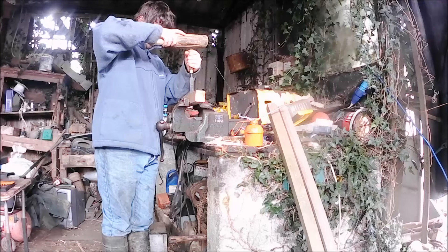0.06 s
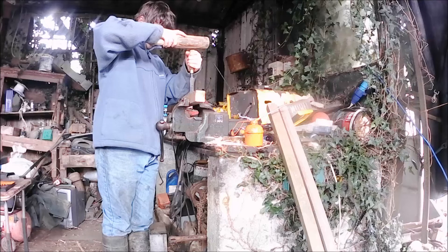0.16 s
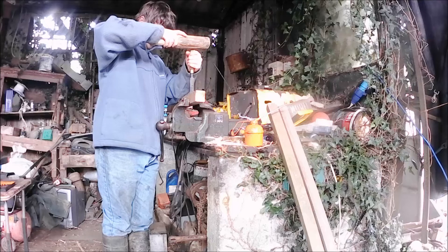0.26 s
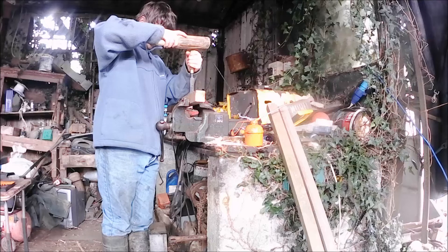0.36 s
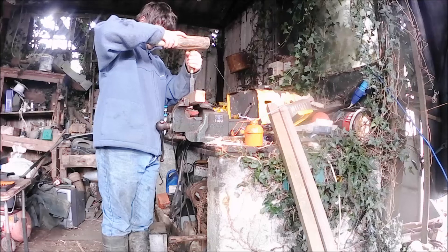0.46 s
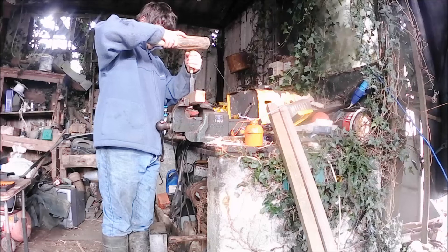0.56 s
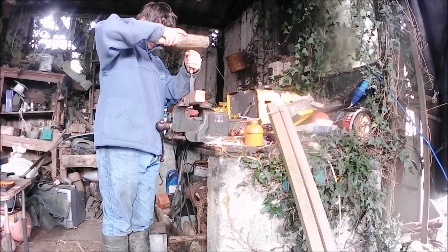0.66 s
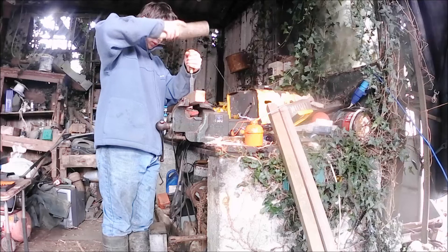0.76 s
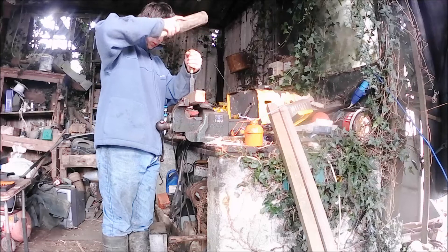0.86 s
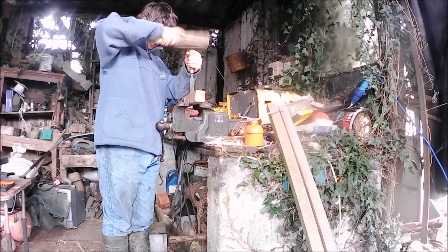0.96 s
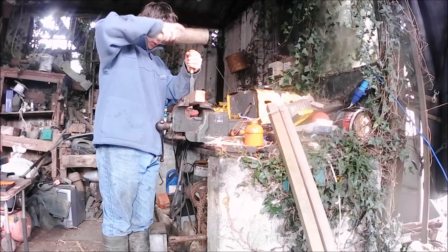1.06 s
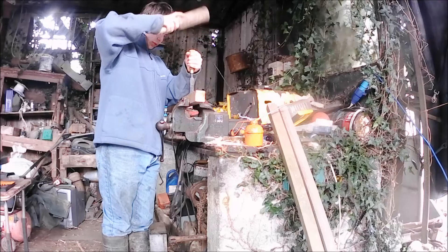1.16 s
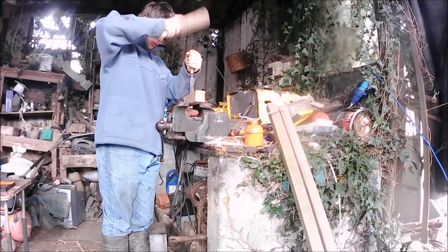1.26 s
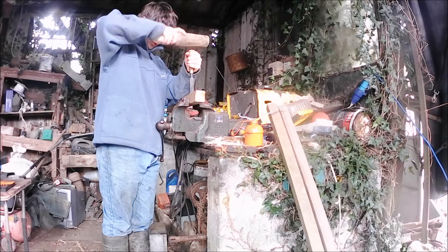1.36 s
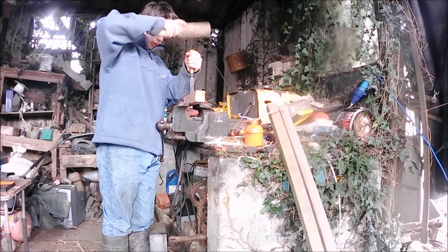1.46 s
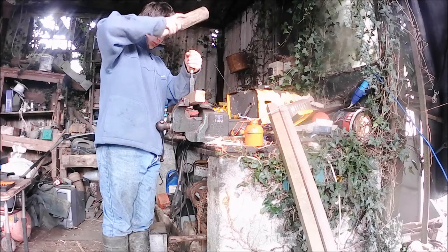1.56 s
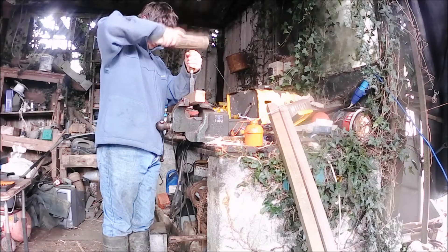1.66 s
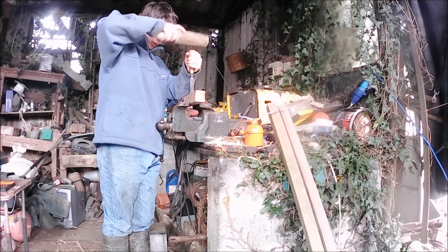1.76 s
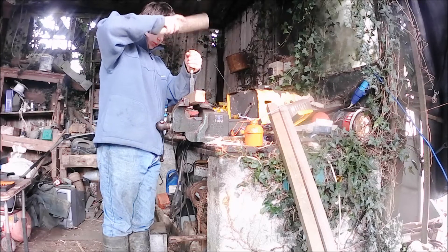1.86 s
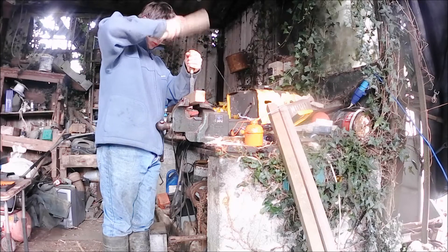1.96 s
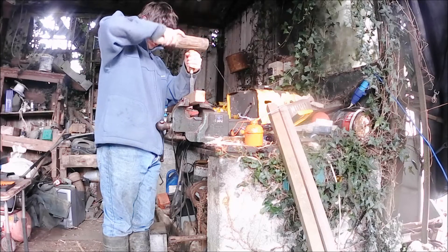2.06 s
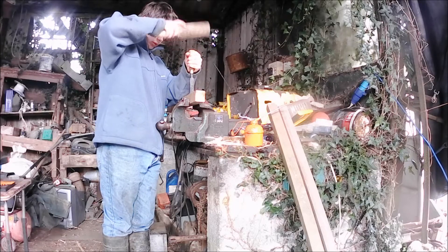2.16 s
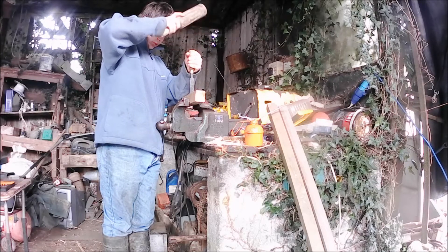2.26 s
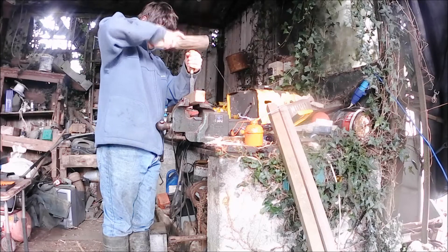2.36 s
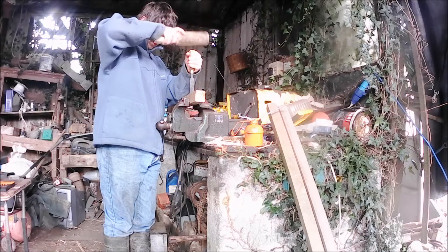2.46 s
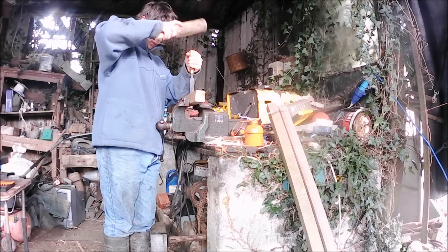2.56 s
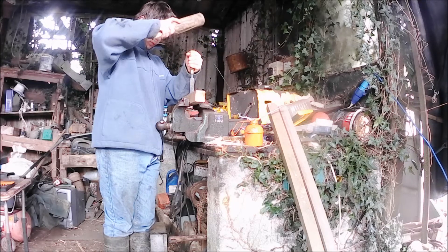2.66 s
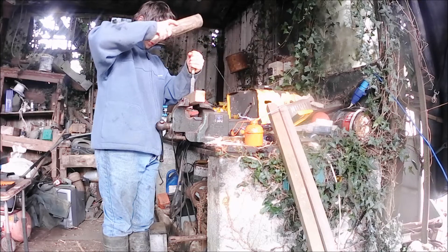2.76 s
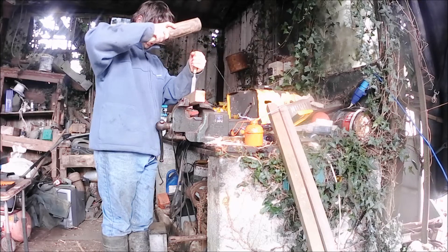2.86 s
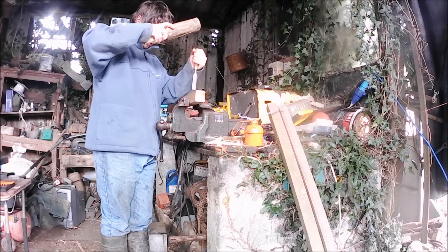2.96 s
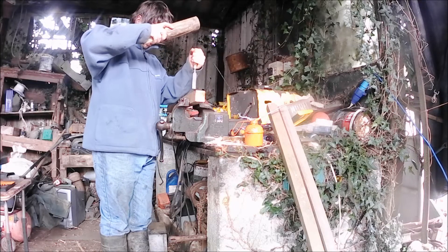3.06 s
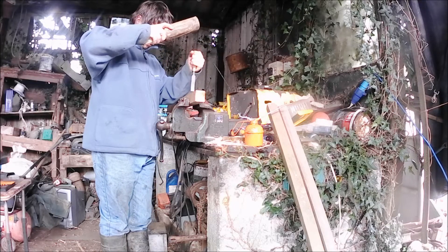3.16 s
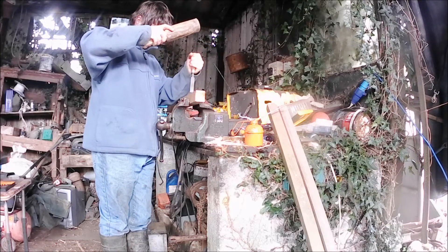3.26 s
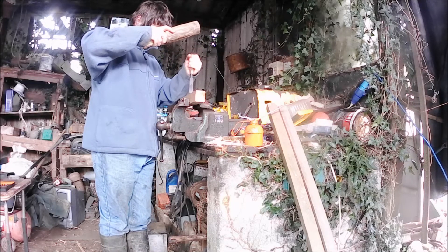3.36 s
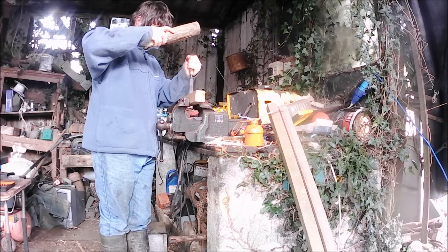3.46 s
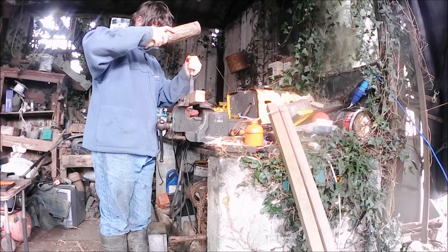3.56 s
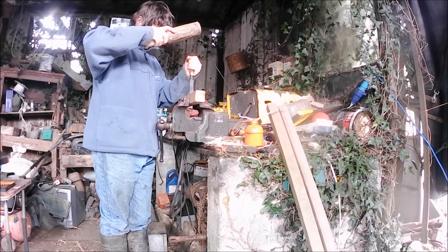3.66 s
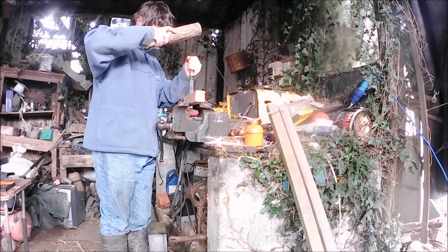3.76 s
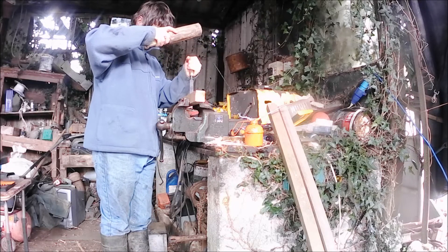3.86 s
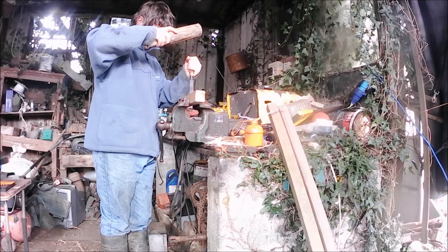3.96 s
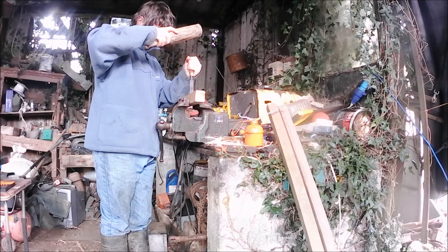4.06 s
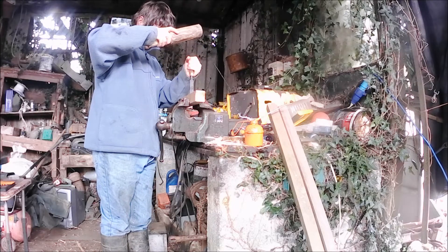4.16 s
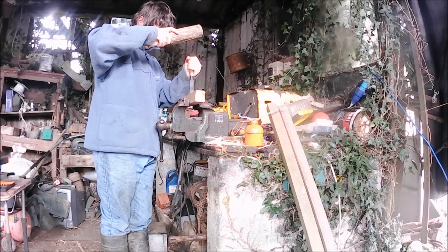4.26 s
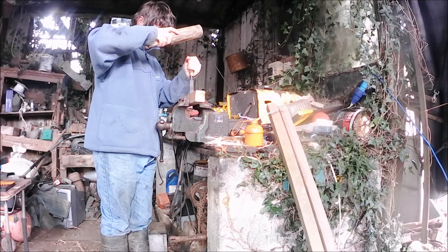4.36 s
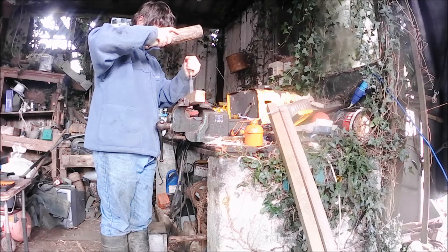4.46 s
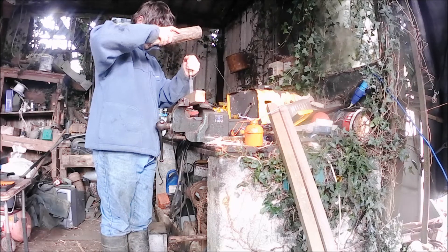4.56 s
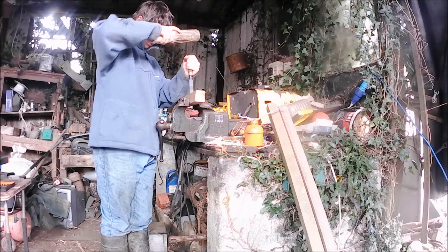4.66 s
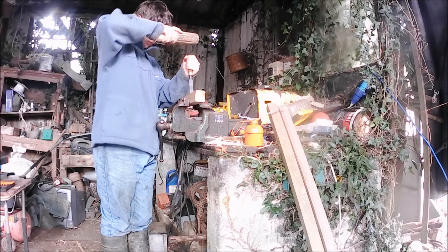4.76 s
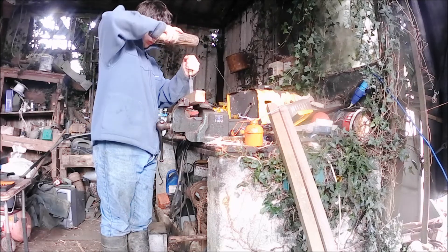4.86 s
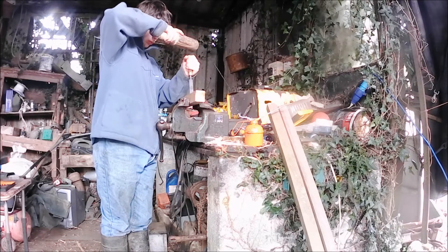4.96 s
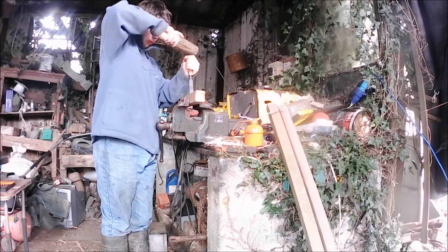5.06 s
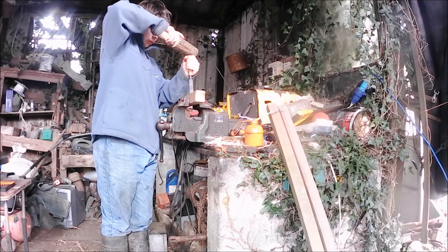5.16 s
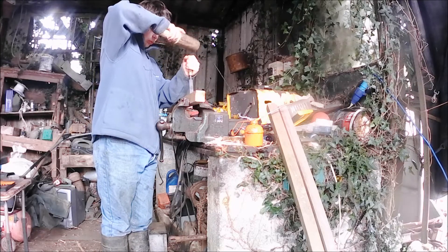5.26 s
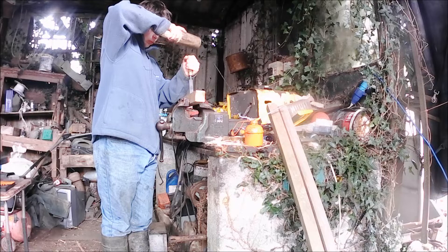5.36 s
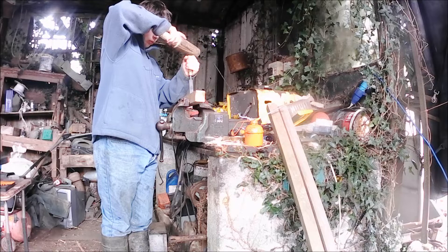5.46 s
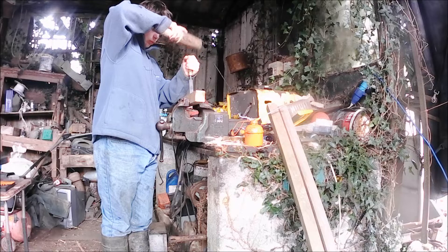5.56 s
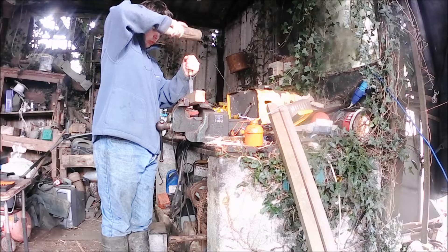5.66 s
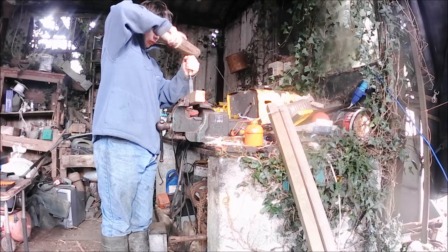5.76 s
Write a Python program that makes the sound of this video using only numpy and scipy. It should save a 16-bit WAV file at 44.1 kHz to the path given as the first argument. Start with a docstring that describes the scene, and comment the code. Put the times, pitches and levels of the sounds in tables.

```python
"""An open shed, heard from a few metres: a wooden mallet knocks a chisel into a block held in a vise.
Each blow is a bright crack of mallet on handle (damped sines and a noise snap), then the deeper knock
of bench and vise; vise jaws and planks ring on, and echoes and a diffuse tail give the shed.
Outside, a sparrow chirrups, distant birds cheep low and others whistle high, all near sines on moving pitches.
Beneath lie the hush of the yard and microphone hiss, shaped from noise, and a thin whine of electronics."""
import sys
import numpy as np
from scipy import signal
from scipy.fft import rfft, irfft
from scipy.io import wavfile
from scipy.ndimage import uniform_filter1d

SR = 44100
rng = np.random.default_rng(int(sys.argv[2]) if len(sys.argv) > 2 else 0)


def master_out(mix):
    """Clip the mix to full scale and print it as 16-bit PCM to the path in sys.argv[1]."""
    frames = np.transpose(np.atleast_2d(mix))
    ceiling = np.clip(frames, -1, 1)
    pcm = np.round(ceiling * 32767).astype(np.int16)
    wavfile.write(sys.argv[1], SR, pcm)


N = 255780  # samples


def amp(db):
    """Amplitude factor for a level in dB."""
    return 10 ** (np.asarray(db) / 20)


def evened(x):
    """Scale to an RMS of 1."""
    return x / np.sqrt(np.mean(x ** 2) + 1e-20)


def read(points, hz):
    """Read a curve over frequency, straight between its points on a log axis."""
    f, value = np.transpose(points)
    return np.interp(np.log(hz + 1), np.log(f + 1), value)


def add(mix, s, sound):
    """Lay a sound into the mix at s seconds, cut at the end of the mix."""
    part = mix[round(s * SR):][:len(sound)]
    part += sound[:len(part)]


def ring(modes, spread_db, rise_cycles):
    """Damped sines; mode levels vary at every call, and low modes take longer to build up."""
    hz, db, t60 = np.transpose(modes)[:, :, None]
    t = np.arange(SR // 2) / SR
    db = db + spread_db * rng.standard_normal(db.shape)
    rise = 1 - np.exp(-t * hz / rise_cycles)
    partials = amp(db - 60 * t / t60) * rise * np.sin(2 * np.pi * hz * t)
    return partials.sum(0)


def tail(decays, start_s):
    """Sparse taps of random sign, one in every 20 samples, each band dying at its own speed; energy 1."""
    slots = np.arange(0, SR // 2, 20)
    taps = np.zeros(SR // 2 + 20)
    places = slots + rng.integers(0, 20, len(slots))
    taps[places] = rng.choice([-1., 1.], len(slots))
    hz, t, z = signal.stft(taps, SR, nperseg=256)
    decay = amp(-60 * t / read(decays, hz)[:, None])
    out = signal.istft(z * decay, SR, nperseg=256)[1]
    out *= np.clip(np.arange(len(out)) / (start_s * SR) - 1, 0, 1)  # builds up after the first walls
    return out / np.linalg.norm(out)


def tone(hz, taper, flutter_db, warble, partials=((1, 0),)):
    """Near sines on a pitch curve, faded in and out, with a hoarse warble in pitch and a flutter in level."""
    slow_noise = uniform_filter1d(rng.standard_normal((2, SR // 4)), size=90)
    flutter, wander = evened(slow_noise)[:, :len(hz)]
    phase = 2 * np.pi * np.cumsum(hz * (1 + warble * wander)) / SR
    fade = signal.windows.tukey(len(hz), np.clip(taper, 0, 1))
    waves = sum(amp(db) * np.sin(k * phase) for k, db in partials)
    return np.sqrt(2) * fade * amp(flutter_db * flutter) * waves


# mallet blows: [t/s, strength/dB, crack brightness/dB, vise jaw ring/dB]
MALLET_BLOWS = [(1.044, -18, -2.5, 2.5), (1.3936, -10, -1.5, -1), (1.737, -8, -6, 3),
                (2.0860, -6, -5, -0.5), (2.43, -3.5, -4.5, -2.5), (5.5009, -20, -14, -2)]


def mallet():
    """The handle cracks, bench and vise answer, jaws and planks ring on; the shed replies."""
    lag_s = .0005  # short offset from table time to start of knock
    shock_s = .0038  # the vise answers after the chisel edge has bitten
    plank_delay_s = .0229  # the planks ring once the thud has settled
    knocks, rings, diffuse = np.zeros((3, N))
    for s, db, crack_db, jaws_db in MALLET_BLOWS:
        s += lag_s
        plank_db = .75 * db  # planks grow more slowly than the blow
        knock = np.zeros(SR)
        add(knock, 0, amp(db + crack_db - 7.5) * handle())
        add(knock, 0, amp(db + crack_db - 6.0) * snap())
        add(knock, .0025, amp(-8) * bench(db))
        add(knock, shock_s, amp(db - 5.5) * vise())
        add(rings, s + shock_s, amp(db + jaws_db - 11.5) * jaws())
        add(rings, s, amp(plank_db - 24.5) * thud())
        add(rings, s + plank_delay_s, amp(plank_db - 40.5) * planks())
        walls = 0.33 * knock
        add(walls, 0, amp(db + crack_db + 9.0) * spread())
        add(knocks, s, knock)
        add(diffuse, s, shed_tail(walls))
    heard = signal.fftconvolve(knocks, echoes())[:N] + diffuse + rings
    # the microphone passes little of the blows below 94.4 Hz
    return signal.sosfilt(signal.butter(3, 94.4, "high", fs=SR, output="sos"), heard)


# modes of mallet head and chisel handle: [f/Hz, relative level/dB, t60/s]
HANDLE_MODES = [(2010, -5.5, 0.011), (2249, -16, 0.12), (2945, -1, 0.023), (3620, -10.5, 0.0063),
                (4960, -6.5, 0.0055)]


def handle():
    """Bright crack: short modes of mallet head and chisel handle."""
    return ring(HANDLE_MODES, spread_db=1.5, rise_cycles=.9)


# colour of the splintering fibres: [f/Hz, relative level/dB per Hz]
SNAP_COLOUR = [(60, -63.5), (200, -15.5), (500, -8), (1200, -11.5), (2000, -0.5), (3300, -3.5),
               (4200, -9.5), (6000, -14), (7500, -29.5), (12000, -37)]


def snap():
    """Splintery snap as the edge parts the fibres: coloured noise that dies within milliseconds."""
    hz, t = np.fft.rfftfreq(4096, 1 / SR), np.arange(4096) / SR
    noise = evened(irfft(rfft(rng.standard_normal(4096)) * amp(read(SNAP_COLOUR, hz))))
    return noise * amp(-60 * t / 0.018) * (1 - np.exp(-t / 0.00028))  # t60 and rise time in s


# modes of bench top and block: [f/Hz, relative level/dB, t60/s]
BENCH_MODES = [(220.7, -19.5, 0.04), (317, -14, 0.027), (406, -22.5, 0.1), (511, -20, 0.11),
               (644, -36, 0.097), (765, -23, 0.052), (814, -26.5, 0.17), (910, -23.5, 0.12),
               (973, -28, 0.17), (1042, -24.5, 0.085), (1108, -22, 0.11), (1178, -22, .08)]
# how the bench grows with the blow: [f/Hz, dB of answer per dB of strength]
BENCH_RESPONSE = [(520, 0.92), (760, .4)]


def bench(strength_db):
    """Deeper knock of bench top and block, whose modes grow more slowly than the blow."""
    over_db = strength_db + 7  # at -7 dB the bench keeps the balance of its table
    modes = [(hz, db + read(BENCH_RESPONSE, hz) * over_db, t60) for hz, db, t60 in BENCH_MODES]
    return ring(modes, spread_db=2.0, rise_cycles=.9)


# modes of the iron vise: [f/Hz, relative level/dB, t60/s]
VISE_MODES = [(1108, -6.5, 0.0069), (1294, 5, 0.014), (1485, -21.5, 0.071), (1774, -6, 0.0084),
              (2990, -7, 0.0056)]


def vise():
    """Knock of the iron vise, heavily damped by the clamped block."""
    return ring(VISE_MODES, spread_db=0.5, rise_cycles=0.68)


# modes of the vise jaws: [f/Hz, relative level/dB, t60/s]
JAW_MODES = [(1342.5, 1, .11), (1352, -9, .22), (1316, -17, .1)]


def jaws():
    """Close modes of the vise jaws that ring on and beat."""
    return ring(JAW_MODES, spread_db=3.5, rise_cycles=10.0)


# bending wave in the planks: [start f/Hz, end f/Hz, glide time constant/s, t60/s]
PLANK_BEND = (480, 113.9, .013, 0.118)


def thud():
    """A low push whose pitch falls as the slower bending waves arrive."""
    start_hz, end_hz, glide_s, t60 = PLANK_BEND
    t = np.arange(SR // 4) / SR
    hz = end_hz + (start_hz - end_hz) * np.exp(-t / glide_s)
    envelope = amp(-60 * t / t60) * (1 - np.exp(-t / 0.00286))
    return envelope * np.sin(2 * np.pi * np.cumsum(hz) / SR)


# modes of the planks: [f/Hz, relative level/dB, t60/s]
PLANK_MODES = [(131.6, 0, 0.56), (124.6, -5, 0.55)]


def planks():
    """A close pair of low plank modes that rings on and beats."""
    return ring(PLANK_MODES, spread_db=3.5, rise_cycles=0.906)


# colour of the whole blow as the walls receive it: [f/Hz, relative level/dB per Hz]
WALL_COLOUR = [(80, -30), (250, -6), (700, -0.5), (1150, 1), (1600, -4), (2100, 2.5), (3300, -10.5),
               (4200, -13.5), (6000, -19), (7500, -28.5), (12000, -40)]


def spread():
    """The blow sent out to all sides, its modes blurred: one click with a smooth causal colour, energy 1."""
    hz = abs(np.fft.fftfreq(4096, 1 / SR))
    log_gain = np.log(amp(read(WALL_COLOUR, hz)))
    # minimum phase puts the energy at the front of the click
    spectrum = np.exp(log_gain - 1j * signal.hilbert(log_gain).imag)
    click = np.fft.ifft(spectrum).real[:2048]
    return click / np.linalg.norm(click)


# decay of the shed: [f/Hz, t60/s]
SHED_DECAY = [(100, 0.62), (400, 0.28), (1300, 0.3), (3000, 0.27), (6000, 0.26), (10000, 0.14)]


def shed_tail(walls):
    """Diffuse tail of the shed, its taps drawn at random for each blow."""
    return amp(-3) * signal.fftconvolve(walls, tail(SHED_DECAY, start_s=0.0033))


# first reflections in the shed: [delay t/s, level/dB against the direct sound]
REFLECTIONS = [(.0065, -16.5), (.009, -17), (0.0162, -13.5), (.023, -16.5), (0.029, -21)]


def echoes():
    """Direct sound plus single reflections of random sign."""
    taps = signal.unit_impulse(SR // 20)
    for s, db in REFLECTIONS:
        taps[round(s * SR)] += amp(db) * rng.choice([-1, 1])
    return taps


# decay of the yard: [f/Hz, t60/s]
YARD_DECAY = [(1500, .3), (5000, .18)]


def birds():
    """Sparrow, sinking cheeps and gliding whistles, smeared by the yard."""
    dry = sparrow() + cheeps() + whistles()
    yard = tail(YARD_DECAY, start_s=0.0031)
    return dry + amp(-2.5) * signal.fftconvolve(dry, yard)[:N]


# chirrups: [t/s, level/dB, pitch factor, lift of the two closing notes/dB]
CHIRRUPS = [(1.322, -55.5, 0.98, 8), (2.027, -56.5, 0.97, 3), (2.943, -65.5, 0.98, 6.5),
            (3.195, -53.5, 0.99, 2), (4.026, -58.5, 0.99, 3.5), (4.561, -72.5, 0.85, -7),
            (5.032, -56, 0.97, 6), (5.805, -58.5, 1.04, 5)]
# notes of a chirrup, before its pitch factor:
# [t/s from the main note, length/s, start f/Hz, end f/Hz, relative level/dB, trill height f/Hz]
CHIRRUP_NOTES = [(-.030, 0.03, 4166, 4600, -7.5, 0.5), (-.001, 0.043, 4220, 3800, -0.5, 1102.5),
                 (.033, .028, 3250, 4150, -12, 1.5), (.062, .036, 3500, 3050, -13, 606)]


def sparrow():
    """Chirrups on one pattern: a rising note, a trilled main note, a low close that climbs, then trills away."""
    dry = np.zeros(N)
    trill_s = .015  # the pitch flicks up once in every such period
    for s, db, factor, lift_db in CHIRRUPS:
        lifts = (0, 0, lift_db, lift_db)
        for (at, length, start_hz, end_hz, note_db, trill_hz), extra_db in zip(CHIRRUP_NOTES, lifts):
            t = np.arange(0, length, 1 / SR)
            flick = np.cos(np.pi * t / trill_s) ** 2 * (t > trill_s / 2)
            hz = start_hz + (end_hz - start_hz) * t / length
            hz += trill_hz * flick ** 4  # the power sharpens each flick
            hz -= 448.8 * np.exp(-t / .004)  # every note slides in from below
            note = tone(factor * hz, taper=0.64, flutter_db=4.5, warble=.017)
            add(dry, s + at, amp(db + note_db + extra_db) * note)
    return dry


# low cheeps of distant birds: [t/s, length/s, mid f/Hz, level/dB]
LOW_CHEEPS = [(.325, 0.061, 2000, -64), (0.811, 0.029, 1840, -72), (0.955, .046, 2060, -67.5),
              (1.599, 0.06, 2253, -67), (2.289, 0.045, 1880, -67), (2.802, 0.03, 1850, -69),
              (3.002, 0.046, 1882, -66.5), (3.22, 0.054, 1820, -72.5), (3.354, 0.044, 1880, -72),
              (3.446, 0.096, 1585, -63.5), (3.608, .047, 2103, -70), (3.688, 0.048, 2090, -70.5),
              (4.267, 0.056, 1860, -71), (4.561, 0.041, 1870, -70), (4.596, .053, 2195, -71.5),
              (4.734, .036, 2240, -74), (4.804, 0.065, 1990, -74), (4.87, 0.089, 2220, -74),
              (5.05, .048, 1730, -72.5), (5.226, 0.1, 2166, -68.5), (5.687, 0.031, 2304, -73)]
# partials of a cheep: [multiple of the pitch, relative level/dB]
CHEEP_VOICE = [(.5, -11), (1, 0), (1.5, -11)]


def cheeps():
    """Low cheeps of distant birds: a few partials on a steadily sinking pitch."""
    dry = np.zeros(N)
    fall = .17  # share of the pitch by which a cheep sinks
    for s, length, hz, db in LOW_CHEEPS:
        sinking = hz * (1 + fall * np.linspace(.5, -.5, round(length * SR)))
        add(dry, s, amp(db) * tone(sinking, taper=0.43, flutter_db=3.0, warble=.04, partials=CHEEP_VOICE))
    return dry


# high whistles: [t/s, length/s, start f/Hz, aim f/Hz, glide time constant/s, level/dB]
HIGH_WHISTLES = [(0.429, 0.044, 2980, 5000, 0.014, -60), (0.473, 0.011, 4800, 2610, 0.0075, -69),
                 (0.508, 0.041, 2975, 5200, .08, -65.5), (3.651, .046, 4130, 4100, 0.018, -72),
                 (4.973, 0.06, 4650, 4280, 0.016, -70)]


def whistles():
    """High near-sine whistles whose pitch glides towards an aim."""
    dry = np.zeros(N)
    for s, length, start_hz, aim_hz, glide_s, db in HIGH_WHISTLES:
        t = np.arange(0, length, 1 / SR)
        glide = aim_hz + (start_hz - aim_hz) * np.exp(-t / glide_s)
        add(dry, s, amp(db) * tone(glide, taper=0.64, flutter_db=5.0, warble=.012))
    return dry


# colour of yard wash and microphone hiss: [f/Hz, relative level/dB per Hz]
HUSH_COLOUR = [(18, -40.5), (30, -11), (177, 0), (280, -2), (792, -7.5), (1320, -11), (1650, -11),
               (2890, -13.5), (6510, -17.5), (12000, -18), (12900, -21.5), (16800, -37), (22000, -120)]


def hush():
    """Distant wash and microphone hiss: random short-time spectra in drifting patches."""
    frames, hz = N // 256 + 5, np.fft.rfftfreq(1024, 1 / SR)
    a, b, patches = rng.standard_normal((frames, 513, 3)).T
    patches = uniform_filter1d(patches, size=20, axis=0)  # across frequency
    patches = evened(uniform_filter1d(patches, size=8, axis=1))  # across time
    flicker = evened(uniform_filter1d(rng.standard_normal(frames), size=4))  # shared by all bands
    level_db = read(HUSH_COLOUR, hz)[:, None] + 1.2 * patches + .7 * flicker
    wash = signal.istft((a + 1j * b) * amp(level_db), nperseg=1024, noverlap=768)[1][:N]
    return amp(-63.5) * evened(wash)


def whine():
    """Thin whine of electronics: slow complex noise shifted up to one pitch."""
    pitch_hz, width_hz, level_db = 6460, 67, -81.5
    r = np.exp(-np.pi * width_hz / SR)
    noise = rng.standard_normal(N) + 1j * rng.standard_normal(N)
    wobble = signal.lfilter([1 - r], [1, -r], noise)
    carrier = np.exp(2j * np.pi * pitch_hz * np.arange(N) / SR)
    return amp(level_db) * evened((wobble * carrier).real)


def scene():
    """Mallet work in front, birds outside, hush and whine beneath."""
    return (mallet() + birds() + hush() + whine())[None]


def record(dry):
    """A short opening silence, then a steep limit on the treble."""
    start_s, edge_hz = .06, 13050
    opened = dry * (np.arange(N) >= start_s * SR)
    low_pass = signal.firwin(511, edge_hz, window=("kaiser", 9), fs=SR)
    return signal.oaconvolve(opened, low_pass[None], "same")


dry = scene()
out = record(dry)
master_out(out)
```